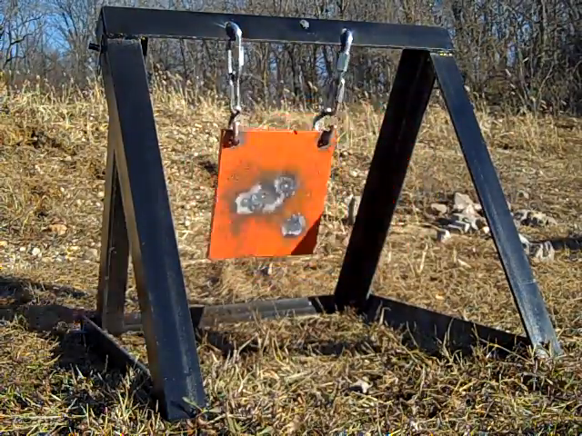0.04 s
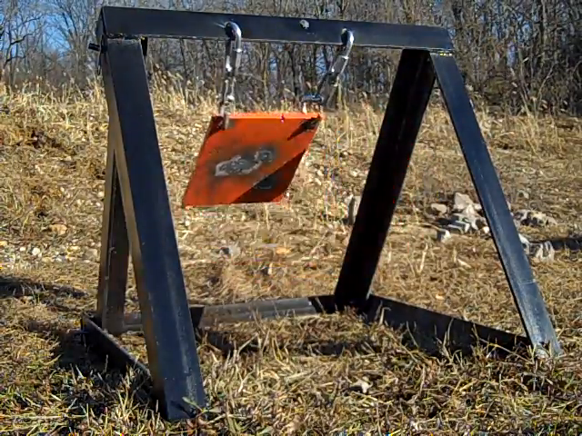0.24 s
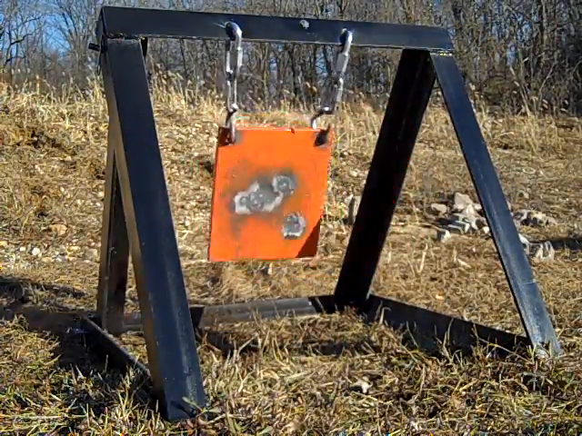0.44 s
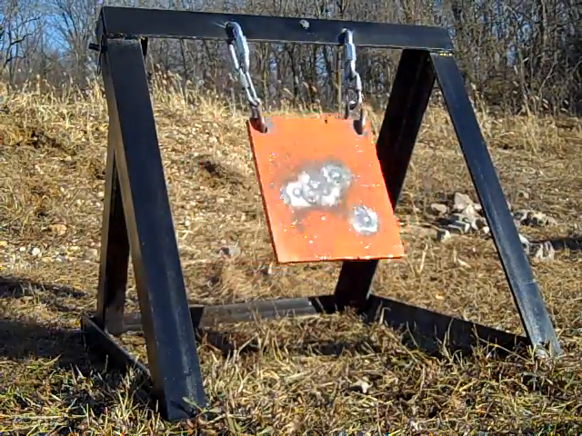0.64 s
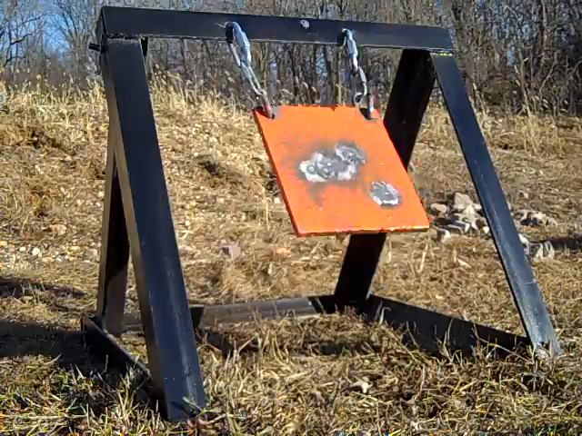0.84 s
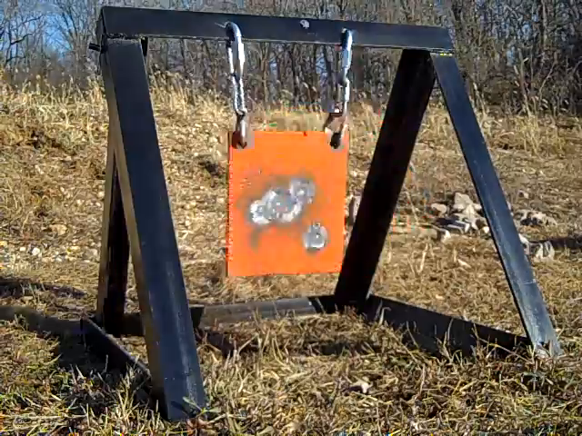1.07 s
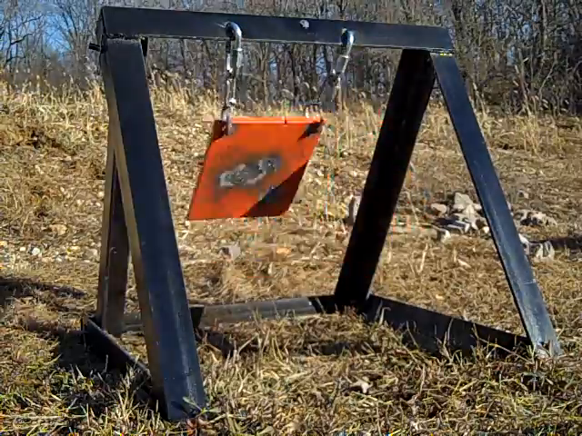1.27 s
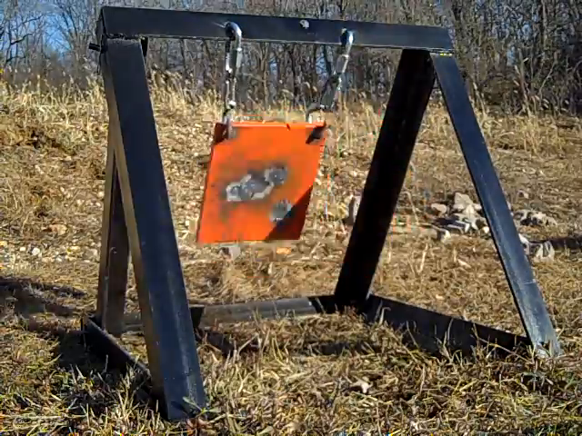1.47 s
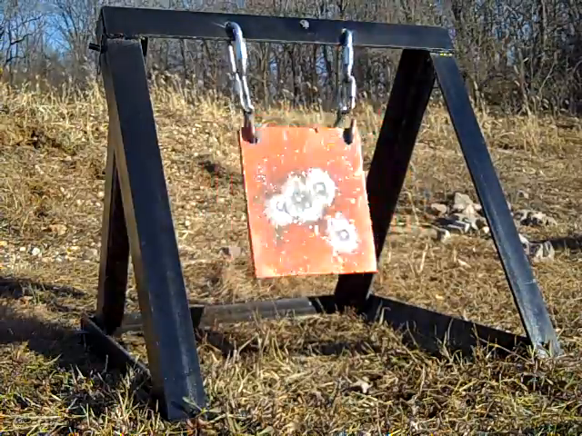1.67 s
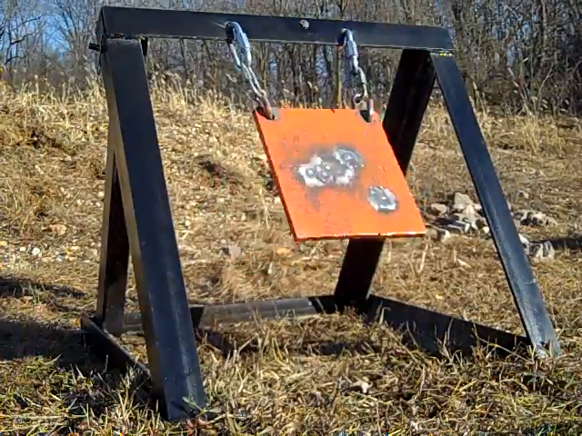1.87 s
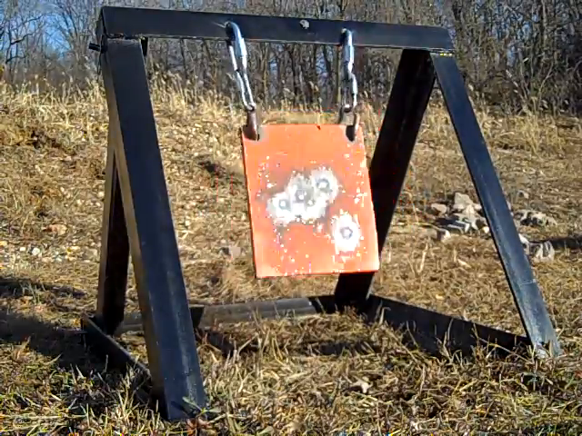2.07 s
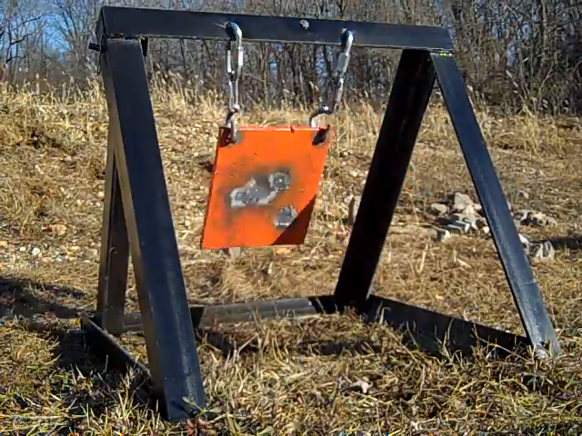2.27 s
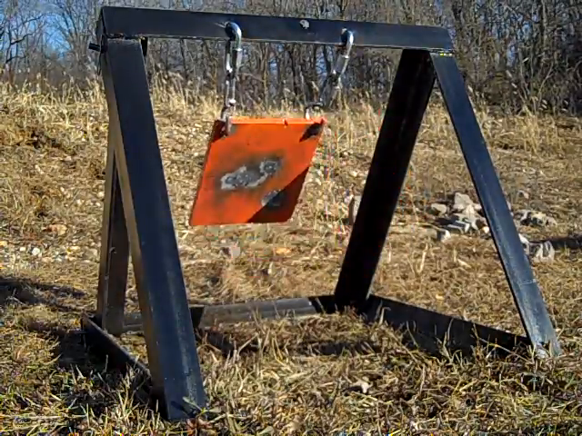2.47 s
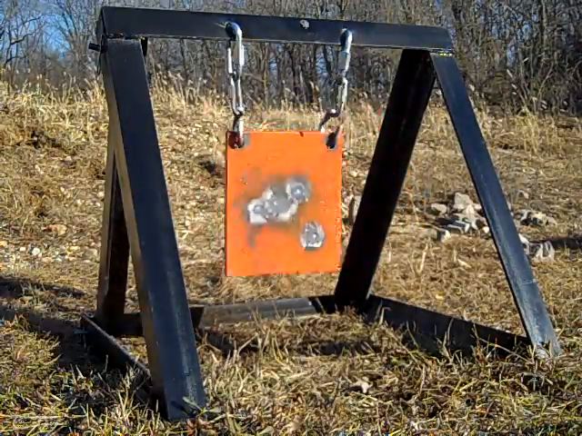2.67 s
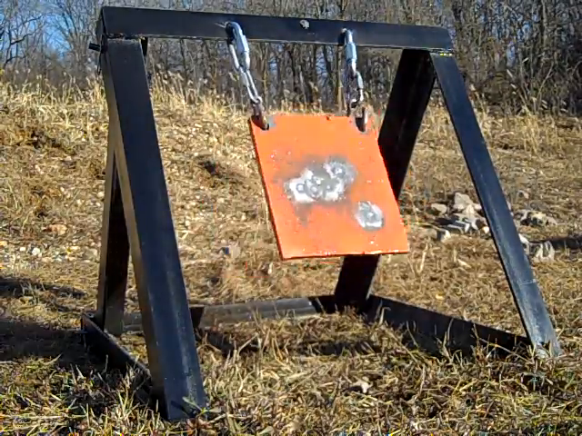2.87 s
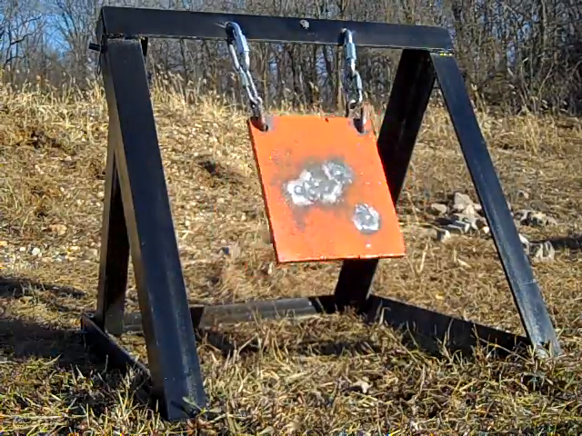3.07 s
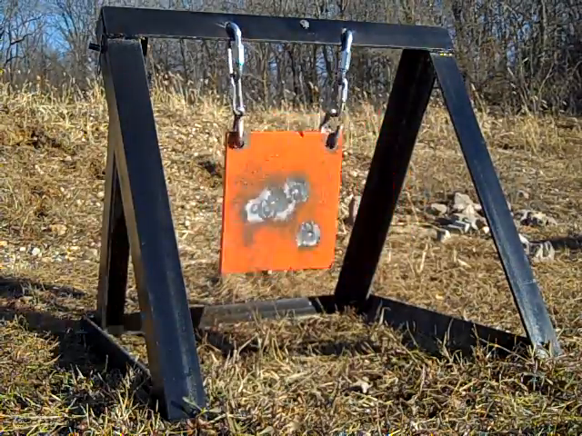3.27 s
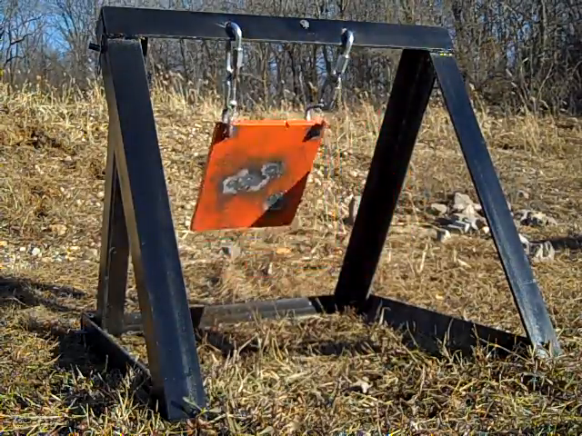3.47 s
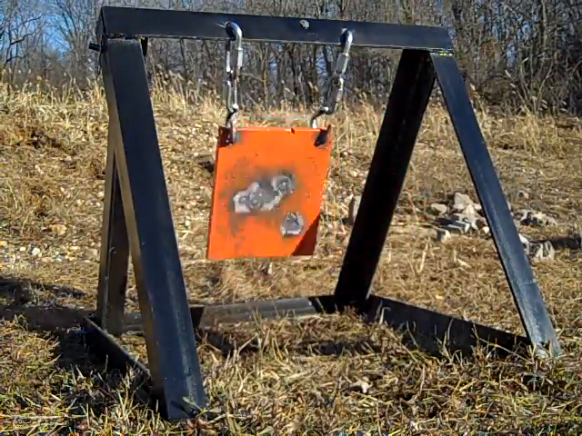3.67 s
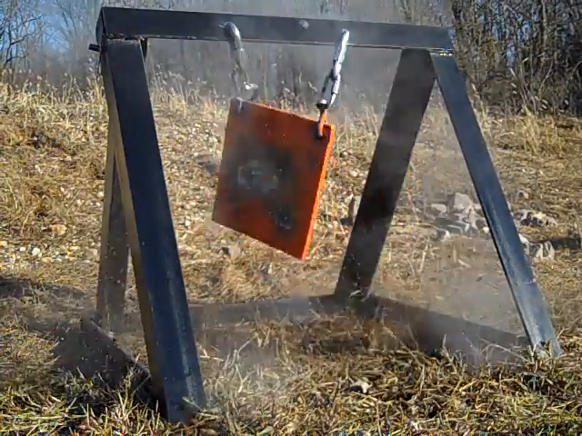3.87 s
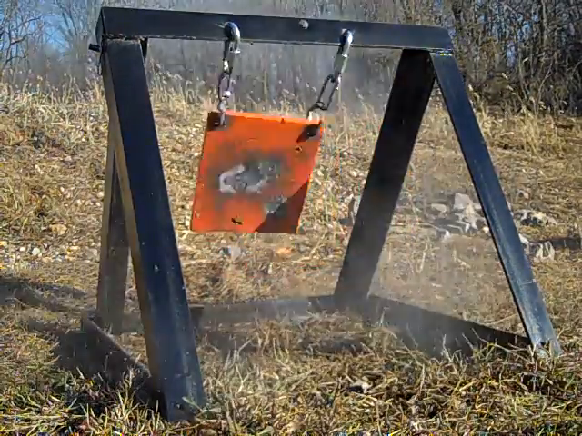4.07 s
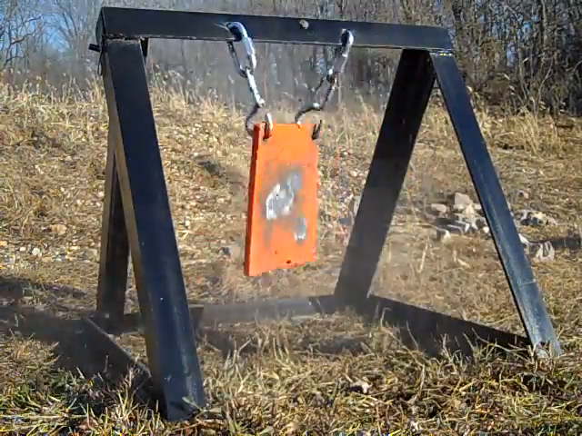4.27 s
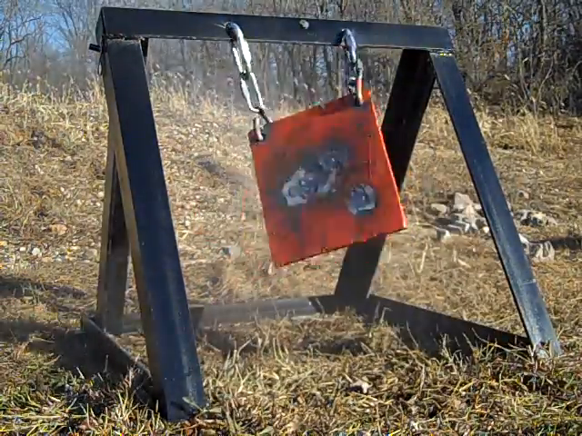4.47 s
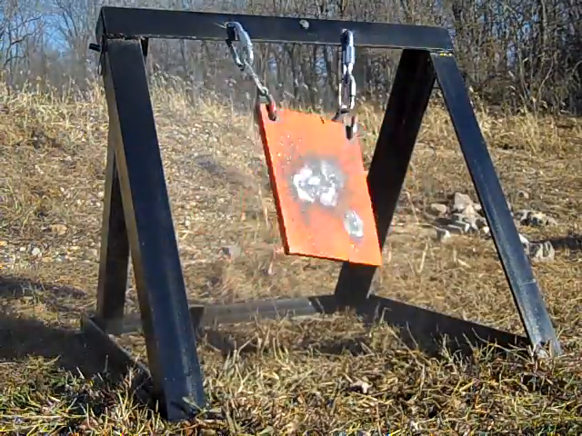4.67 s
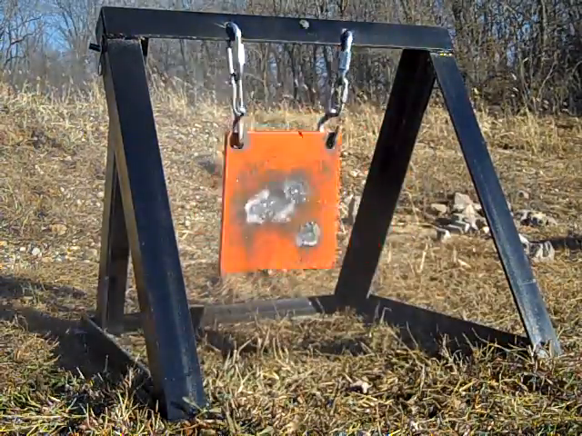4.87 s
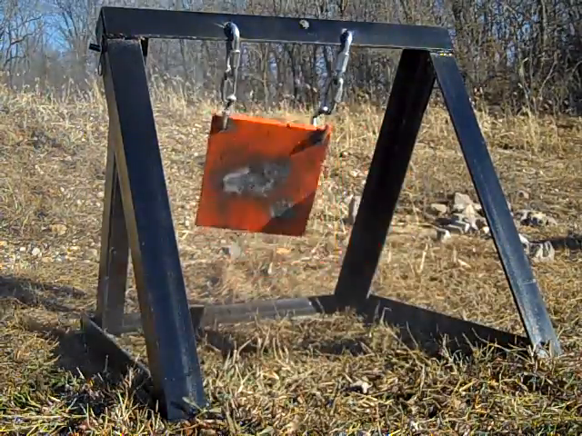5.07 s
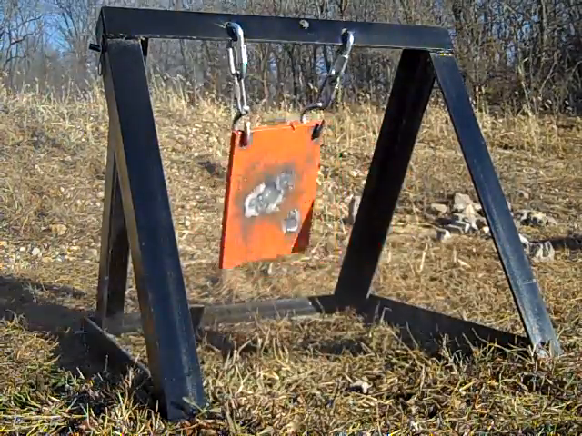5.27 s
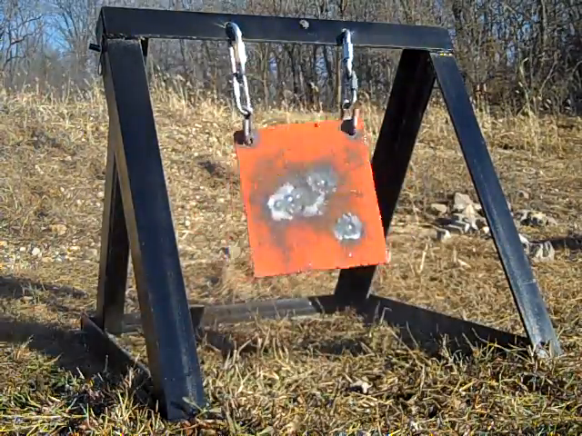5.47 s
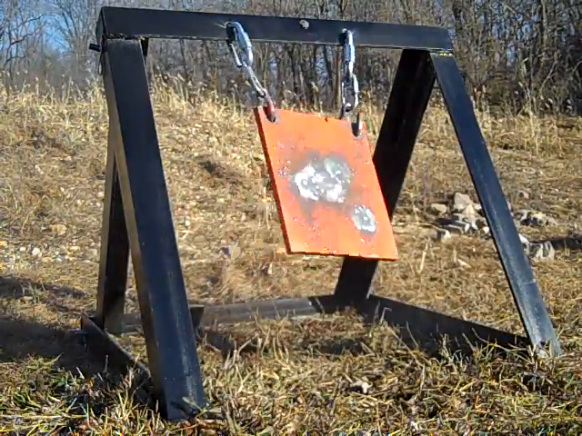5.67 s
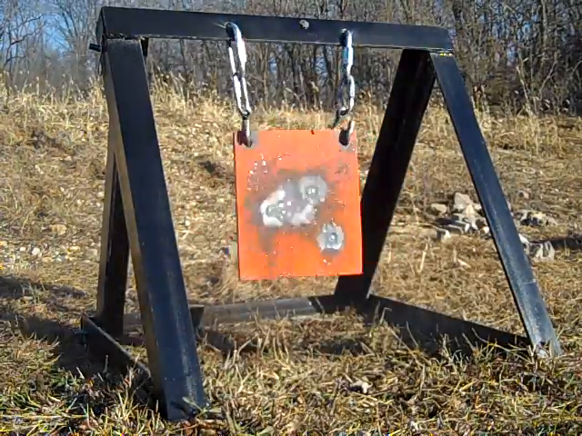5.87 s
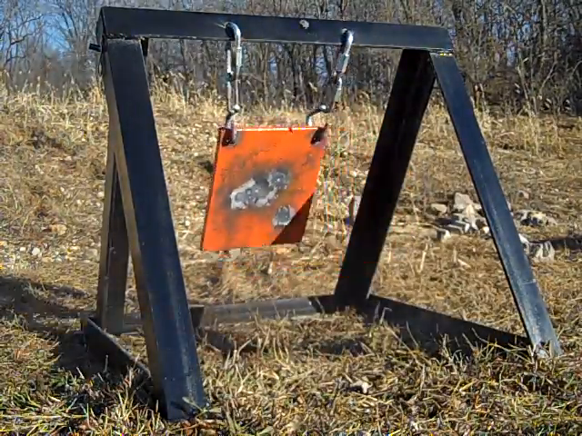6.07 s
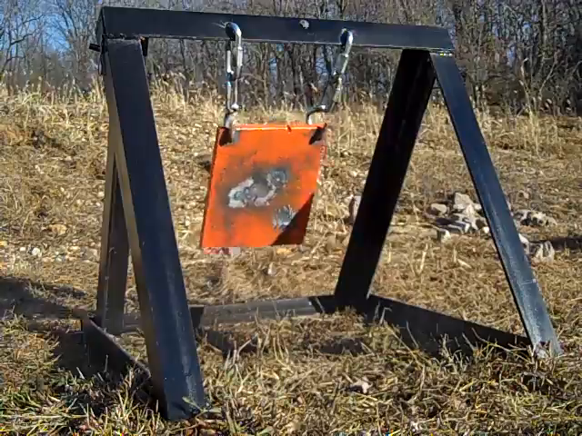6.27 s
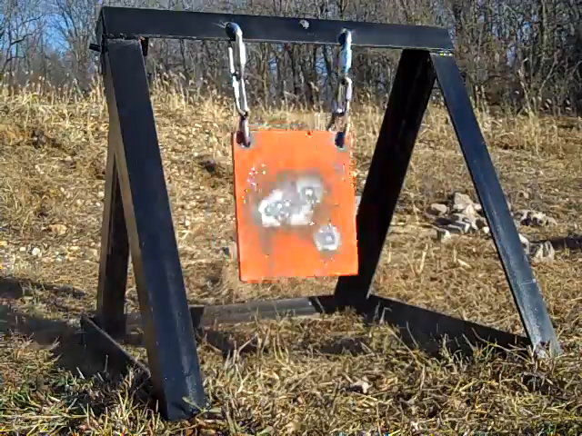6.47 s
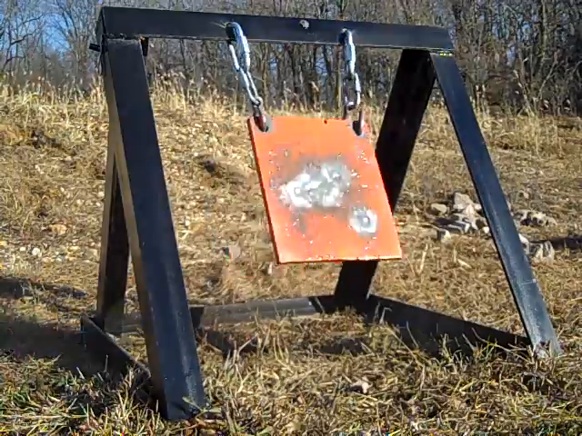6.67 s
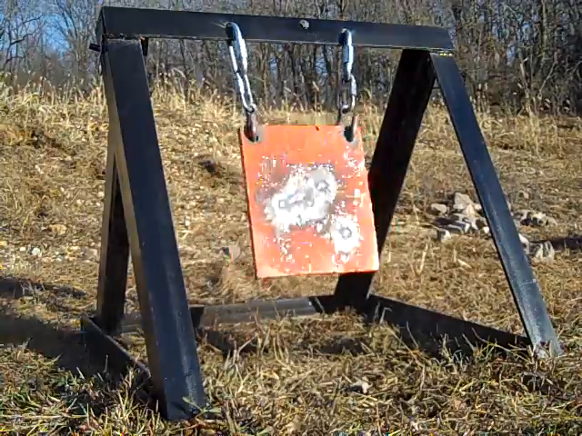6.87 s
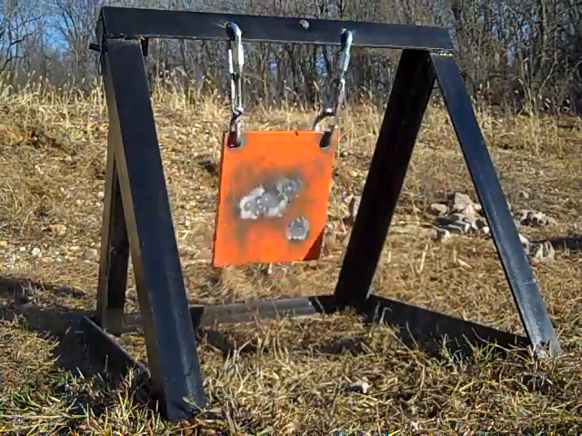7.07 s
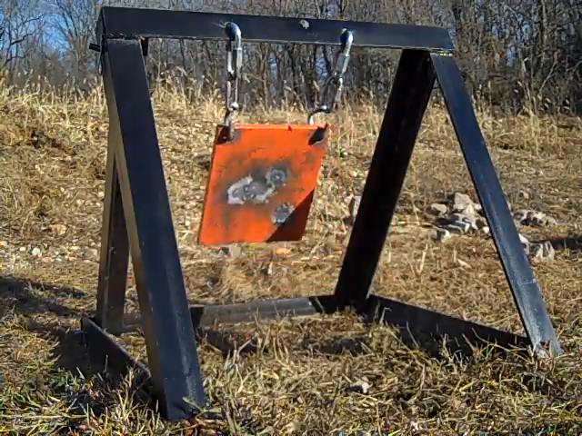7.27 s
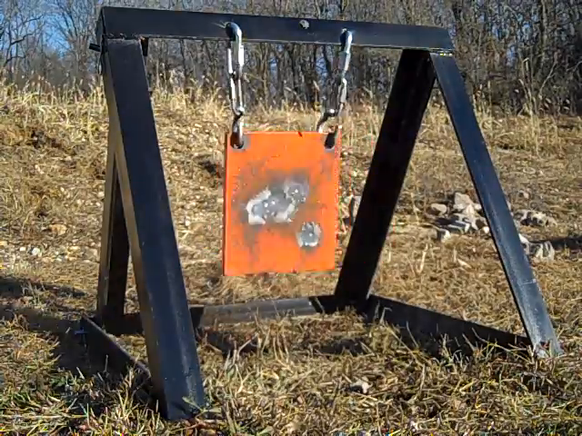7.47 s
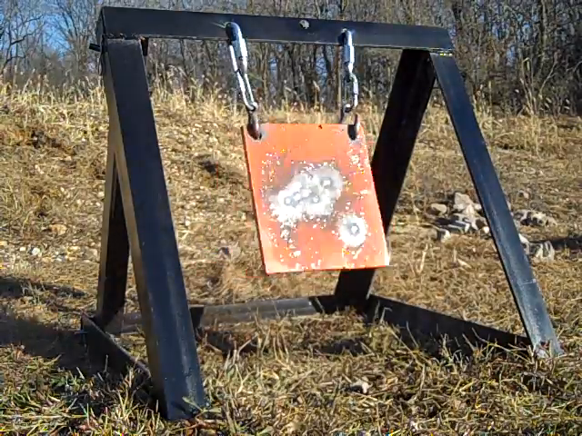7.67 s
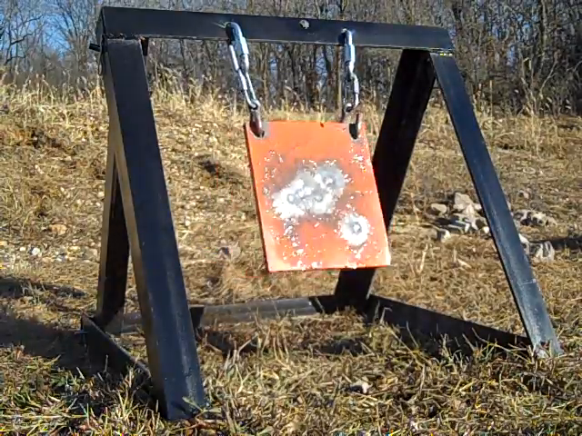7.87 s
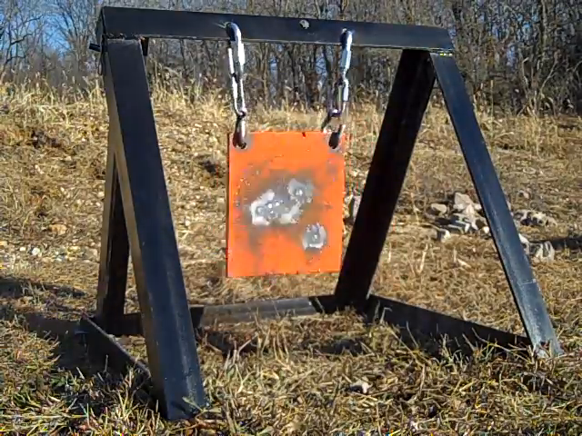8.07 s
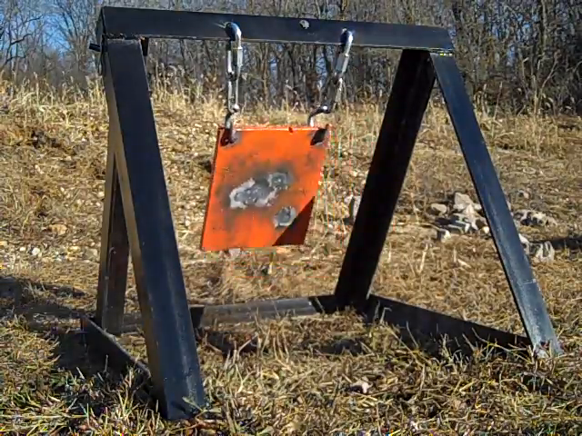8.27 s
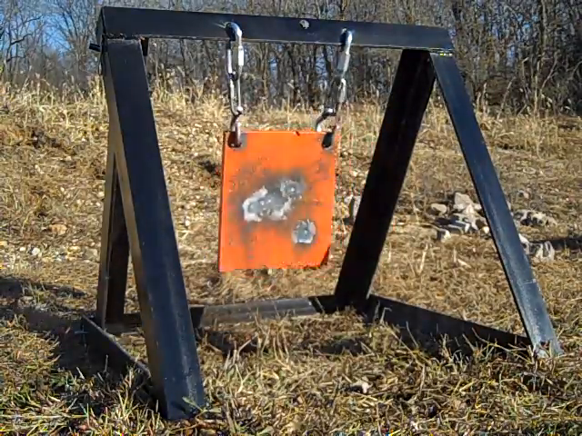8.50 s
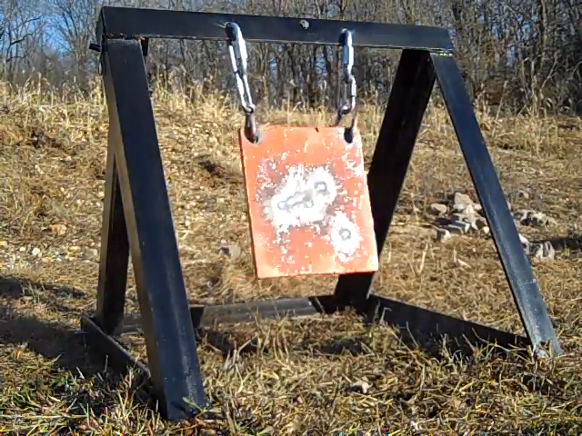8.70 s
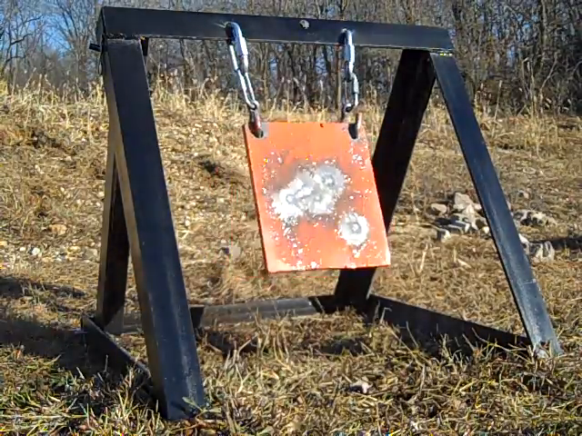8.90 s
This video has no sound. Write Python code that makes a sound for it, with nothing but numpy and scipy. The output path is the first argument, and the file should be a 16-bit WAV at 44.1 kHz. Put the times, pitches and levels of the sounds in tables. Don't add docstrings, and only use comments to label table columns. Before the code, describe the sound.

A steel plate swings on two chains in a dry field, heard very close in stereo. Sharp double clinks sound at about 0, 1.1, 2.2 and 3.3 seconds, with small loose ticks between, over faint low hum and grass hiss. From about 2.9 wind puffs flutter low against the microphone, strongest near 3.6. At 3.85 a bullet hits: a violent, clipped crack with hissing spatter and a high metallic ring that wavers between the sides and is quickly damped. At 4.02 the distant gunshot arrives as a dull thump, its low echo swelling from the woods around 4.7 and fading. Chains jangle from 4.4, with a hard bouncing snap at 4.9 and another strong clack at 5.4, then scattered rattles. Calmer double clinks return near 5.9, 7.05 and 8.1, with light ticks between, until the end near 8.9.

```python
import sys
import numpy as np
from scipy import signal
from scipy.fft import rfft, irfft, next_fast_len
from scipy.io import wavfile
from scipy.ndimage import uniform_filter1d, map_coordinates

SR = 44100
rng = np.random.default_rng(int(sys.argv[2]) if len(sys.argv) > 2 else 0)


def dump(signal):
    limited = np.clip(np.atleast_2d(signal).T, -1, 1)
    pcm = np.round(limited * 32767).astype(np.int16)
    wavfile.write(sys.argv[1], SR, pcm)


def to_linear_factor(level_db):
    exponent = np.asarray(level_db, float) / 20
    return 10 ** exponent


N = 394254
T = np.arange(N) / SR
STRIKE_S, BLAST_S = 3.8506, 4.0169

# t/s, peak level/dB, top level/dB, own ring f/Hz
FIRST_SNAPS = [
    (0.0276, -10.5, -12.5, 6370),
    (1.1228, -7.5, -14.5, 6490),
    (2.2079, -13.5, -10.5, 5410),
    (3.2902, -16, -13, 5530),
    (4.9069, -20.5, -1, 6030),
    (5.906, -26.5, -18, 2220),
    (7.0388, -22.5, -17, 2832),
    (8.105, -12.5, -23.5, 5600),
]
# t/s, peak level/dB, top level/dB, own ring f/Hz
SECOND_SNAPS = [
    (0.0611, -6, -15.5, 2212),
    (1.16, -8.5, -14.5, 2200),
    (2.2523, -8.5, -12, 3710),
    (3.3375, -10.5, -17, 5350),
    (4.9299, -4.5, -6.5, 7620),
    (5.9436, -10, -17, 5600),
    (7.0849, -12.5, -15, 3600),
    (8.1585, -16.5, -20, 5400),
]


def unit(x):
    return x / np.sqrt(np.mean(x ** 2) + 1e-20)


def along(points, hz):
    f, v = np.transpose(points)
    return np.interp(np.log(hz + 1), np.log(f + 1), v)


def curves(rows):
    s, *cols = np.transpose(rows)
    return [np.interp(T, s, c) for c in cols]


def during(rows):
    return (T >= rows[0][0]) & (T < rows[-1][0])


def wobble(rate_hz, size=N):
    knots = rng.standard_normal(int(size * rate_hz / SR) + 4)
    return map_coordinates(knots, [T[:size] * rate_hz])


def rush(spectrum, alike):
    m = next_fast_len(N)
    hz = np.fft.rfftfreq(m, 1 / SR)
    turn = np.arccos(np.clip(along(alike, hz), -1, 1)) / 2
    shape = to_linear_factor(along(spectrum, hz)) * [np.cos(turn), np.sin(turn)]
    mid, side = irfft(rfft(rng.standard_normal((2, m))) * shape, m)[:, :N]
    return unit(np.array([mid + side, mid - side]))


def patchy(x, depth_db):
    z = signal.stft(x, nperseg=512)[2]
    patches = uniform_filter1d(rng.standard_normal(z.shape[1:]), size=2, axis=0)
    patches = uniform_filter1d(patches, size=4, axis=1)
    return unit(signal.istft(z * to_linear_factor(depth_db * unit(patches)), nperseg=512)[1][:, :N])


def cut_short(since, hold_s, level_db, fade_db_s, drop_db_s, remnant_db, remnant_fade_db_s):
    after = np.clip(since - hold_s, 0, None)
    return to_linear_factor(level_db - fade_db_s * since - drop_db_s * after) + to_linear_factor(remnant_db - remnant_fade_db_s * after)


def strike():
    ringing = spatter() + weak_modes()
    return ringing * (T >= STRIKE_S) + strong_modes()


def spatter():
    # f/Hz, width/Hz, level/dB
    spatter_modes = [(1520, 24, -3), (1780, 15, -2.5), (2820, 37, -3.5), (3450, 39, -8), (3720, 20, -8),
                     (5010, 31, 0), (5677, 27, -11.5), (5920, 23, -7), (6070, 37, -8)]
    since = np.clip(T - STRIKE_S, 0, 1)
    apart = [(1000, 0.083)]
    burst = to_linear_factor(-3.5 - 60 * (since / 0.031) ** 4) * rush(
        [(60, 1.5), (300, 3), (700, -3.5), (6500, -2), (13500, -5.5), (14500, -30.5), (21000, -31.5)], apart)
    spray_s = .142
    low_gain = cut_short(since, spray_s, -17, 13.5, 950.5, -40.5, 112)
    high_gain = cut_short(since, spray_s, -21.5, 49.5, 399.5, -49, 199)

    rough = to_linear_factor(1.5 * wobble(300))
    low = rush([(100, 1), (400, 0.5), (2400, -2), (3400, -4.5), (5200, -1.5), (5500, -13.5), (5800, -3.5),
                (9000, -20.5)], apart)
    crowded = to_linear_factor(3.5 * wobble(40, size=N // 2 + 1))
    low = rough * patchy(irfft(rfft(low) * crowded, N), depth_db=4.5)
    hz = np.fft.rfftfreq(N, 1 / SR)
    streaks = sum(to_linear_factor(db) * width / np.hypot(width, hz - f) for f, width, db in spatter_modes)
    low += to_linear_factor(-7) * unit(irfft(rfft(rng.standard_normal((2, N))) * streaks, N))

    high = rush([(5500, -22.0), (7500, 0.0), (10000, -4.0), (12000, -14.0), (14200, -61.5)], apart)
    top = rush([(9000, -20), (11000, -2.0), (13500, 0), (14200, -57.0)], apart)
    high += to_linear_factor(-1.5 - 60 * since / 0.51) * top
    return burst + low_gain * low + to_linear_factor([[2], [-2]]) * high_gain * high


def strong_modes():
    # t/s, level/dB
    low_rows = [(3.851, -36), (3.893, -38.5), (3.903, -20), (3.922, -24), (3.95, -12), (3.98, -11.5),
                (4.08, -28.5), (4.115, -56), (4.45, -60)]
    mid_rows = [(3.851, -15), (3.866, -14), (3.877, -2.5), (3.895, -13.5), (3.915, -18), (3.95, -40),
                (4.0, -58)]
    high_rows = [(3.88, -36), (3.935, -10), (3.962, -33), (3.995, -19.5), (4.045, -32.5), (4.082, -25),
                 (4.12, -50.5), (4.22, -53), (4.3, -65)]
    out = beamed(low_rows, rest_hz=4371, sag_hz=22, settle_s=.11, lean_db=30, drift_db_s=-16, half_db=-13.5)
    out += beamed(mid_rows, rest_hz=6466, sag_hz=90, settle_s=.015, lean_db=-18, drift_db_s=2)
    return out + beamed(high_rows, rest_hz=6568, sag_hz=25, settle_s=.05, lean_db=3, drift_db_s=-21.5)


def beamed(rows, rest_hz, sag_hz, settle_s, lean_db, drift_db_s, half_db=-200):
    db, = curves(rows)
    since = np.clip(T - STRIKE_S, 0, 1)
    pan_db = lean_db * np.exp(-since / 0.019) + drift_db_s * since
    hz = rest_hz - sag_hz * np.exp(-since / settle_s)
    phase = 2 * np.pi * np.cumsum(hz) / SR + np.array([[.3], [-.3]])
    buzz = to_linear_factor(half_db + 0.37 * (db + 11.0) + 3 * wobble(79)) * np.sin(.496 * phase + 1.1 * wobble(60))
    tone = np.sin(phase) + buzz * (T < BLAST_S)
    level_db = db + np.array([pan_db, -pan_db]) / 2 + 1.1 * wobble(60)
    return np.sqrt(2) * to_linear_factor(level_db) * tone * during(rows)


def weak_modes():
    mode_hz = [1518, 2500, 5017, 7160, 7192, 8129, 8759, 9145, 9170, 10340, 10830, 11850, 12900, 13400]
    # level/dB, t60/s
    mode_decays = [(-18, 0.38), (-15.5, .3), (-6.5, 0.24), (-4.5, 0.14), (2, 0.27), (-13, .3), (-14.5, .3),
                   (-8.5, 0.58), (-12, 1.0), (-19.5, 0.74), (-14.5, .3), (-17, .2), (-5.5, .15),
                   (-23.5, .6)]
    out, n = np.zeros((2, N)), SR // 2
    t = T[:n]
    weak = np.zeros((2, n))
    for hz, (db, t60_s) in zip(mode_hz, mode_decays):
        flicker_db = 3.5 * np.array([wobble(16, size=n), wobble(13, size=n)])
        weak += to_linear_factor(db - 60 * t / t60_s + flicker_db) * np.sin(2 * np.pi * hz * t)
    caught = cut_short(t, 0.267, -18.5, -1, 600, -40, 153)
    out[:, round(STRIKE_S * SR):][:, :n] = to_linear_factor(4.0 + np.array([[3], [-3]])) * caught * weak
    return out


def glance():
    # t/s, level/dB
    swell = [
        (4.975, -56),
        (5.003, -34),
        (5.03, -45),
        (5.075, -60),
    ]
    return np.sqrt(2) * to_linear_factor(curves(swell)[0]) * during(swell) * np.sin(2 * np.pi * 6600 * T)


def chains():
    # f/Hz, density/dB per Hz
    clack = [(240, -58.5), (400, -26.5), (628, -33.5), (727, -23.5), (1130, -20), (1530, -21), (2140, -3.5),
             (2580, -19.5), (2940, -13), (4110, -13), (4900, -11.5), (7580, -9.5), (13000, -53)]
    # f/Hz, level/dB, t60/s
    chain_modes = [(518, -20.5, .08), (766, -23.5, 0.13), (948, -19, 0.11), (1130, -14.5, 0.095),
                   (1377, -13, 0.071), (1817, -10.5, 0.084), (2116, -3.5, 0.067), (2190, -8, 0.11),
                   (2520, -12, 0.13), (2650, -8, 0.1), (2833, -9, 0.2), (3020, -12.5, 0.2),
                   (3440, -18.5, 0.12), (3570, -17.5, 0.1),
                   (3668, -15, 0.15), (4200, -6.5, 0.056), (4740, 1.5, 0.049), (4990, -8.5, 0.11),
                  (5520, -10, 0.064), (5420, -8, .1), (5530, -9.5, 0.18), (5750, -6.5, 0.066),
                  (6370, -5.5, 0.073), (6713, -13, .08), (6800, -15.5, .12), (7470, -5, .15),
                  (7170, -5, 0.071), (8290, -7, 0.13)]
    # f/Hz, level/dB, t60/s
    plate_modes = [(4357, -2, 0.11), (4940, -14, .2), (5346, -13.5, .2), (5600, -8.5, 0.28),
                   (6050, -13.5, 0.19), (6300, -6, 0.08), (6300, -9, 0.23), (6560, -9.5, .3),
                   (7176, -8.5, 0.091), (8150, -4.5, 0.15), (8650, -13, 0.12), (9160, -16.5, 0.09),
                   (10800, -29.5, 0.45)]
    out, t = np.zeros((2, N + SR)), np.arange(SR // 5) / SR
    n = len(t)
    hz = np.fft.rfftfreq(n, 1 / SR)
    rows = contacts()
    chance = rng.standard_normal((len(rows), 2, 4, 30))
    tap_chance = rng.uniform(size=(len(rows), 2, 5, 1))
    combs_db = 6 * rng.standard_normal((len(rows), 200))

    rattle = rush(clack + [(14000, -87)], [(1000, 1.0), (3000, 0.73), (6500, 0.36), (12000, .1)])
    rattle = np.pad(rattle * to_linear_factor(4.2 * wobble(250)), ((0, 0), (0, SR)), "wrap")
    shake = np.pad(to_linear_factor(2.5 * wobble(180)), (0, SR), "wrap")
    edge = np.diff(rng.standard_normal((2, 2 * SR)), n=4) / 8
    turn = np.exp(-(t / .07) ** 4) + to_linear_factor(-20)
    rise = np.clip((t - .0009) / .0005, to_linear_factor(-20), 1) * (1 - np.exp(-t / .0003))

    for k, (s, db, top_db, own_hz) in enumerate(rows):
        link_chance, plate_chance = chance[k]
        late, size = tap_chance[k]
        seated = seating(k, s)
        taut = bool(seated)
        i = round(s * SR)
        rough = shake[i:i + n]

        after = t - .06 * late
        taps = np.clip(after / .0015, 0, 1) * to_linear_factor(-15 - 12 * size - 16 * late - 60 * np.abs(after) / .03)
        fade = to_linear_factor(-60 * t / .025) + to_linear_factor(-11 - 60 * t / .12) + taps.sum(axis=0)

        low_db = -14 - .3 * db
        tilt = [(1000, low_db + 11.5), (2200, low_db + 8), (4500, 0.004), (8000, top_db + 11.5)]
        comb_db = np.interp(hz, np.linspace(0, SR / 2, combs_db.shape[1]), combs_db[k] * (1 - 0.34 * taut))
        grit = irfft(rfft(rattle[:, i:i + n]) * to_linear_factor(along(tilt, hz) + comb_db - 2.5), n)
        knock = to_linear_factor(-7.0 - .5 * taut) * grit * fade

        loose = ring(chain_modes, tilt, 0.85 + 0.5 * size[0], t, link_chance)
        knock += to_linear_factor(-16.0 - 4.5 * taut) * rough * loose
        knock += to_linear_factor(top_db - 15.5 - 60 * t / 0.012) * edge[:, i % SR:][:, :n]

        twist = np.exp(-abs(s - STRIKE_S) / 1.67) * (s > STRIKE_S)
        share_db = -22.5 + (21 + 0.46 * db) * twist
        knock += to_linear_factor(share_db) * turn * ring(plate_modes, [(4000, 0.00036)], 0.7, t, plate_chance)
        knock += to_linear_factor(-11.5 - 60 * t / 0.07) * np.sin(2 * np.pi * own_hz * t)
        if seated:
            modes, seated_db = seated
            taut_ring = ring(modes, [(1000, -4), (2000, 0)], .9, t, plate_chance[:, ::-1],
                             spread=.001, scatter_db=3)
            knock += to_linear_factor(seated_db) * np.sqrt(rough) * taut_ring
        soft_rise = 1 - np.exp(t / (.00006 * db))
        out[:, i:i + n] += to_linear_factor(db) * knock * rise * soft_rise
    ground = np.pad(out, ((0, 0), (round(.0047 * SR), 0)))[::-1, :N]
    return out[:, :N] + to_linear_factor(-13) * ground


def contacts():
    # t/s, peak level/dB, top level/dB, own ring f/Hz
    jolts = [(0.5011, -25.5, -24, 2390), (0.6434, -29, -9, 2104), (1.5955, -27, -19, 2260),
             (1.734, -28.5, -14.5, 2200), (2.6715, -28, -25, 2210), (2.7503, -42.5, -9, 4660),
             (2.827, -29, -19, 2210), (3.777, -29.5, -23, 2230), (4.411, -18.5, -11.5, 5500),
             (4.4642, -29.5, -1.5, 5540), (4.54, -13.5, -33, 1994), (4.7004, -20, -5, 5600),
             (4.745, -15.5, -13.5, 2130), (5.171, -36.5, -9, 4730), (5.205, -22.5, -24, 1970),
             (5.2714, -23, -19, 2070), (5.402, -9, -12, 6740), (5.447, -29.5, -15, 2950),
             (5.6974, -17, -19, 2040), (6.042, -24.5, -29, 2890), (6.093, -30, -7.5, 6150),
             (6.4927, -17, -21, 2190), (6.549, -33.5, -15, 5530), (7.019, -51, 5, 7750),
             (7.5976, -34.5, -9, 6320), (7.662, -39, -12, 5760), (8.652, -33, -19.5, 8100)]
    # t/s, peak level/dB
    bounces = [
        (4.9363, -8.5),
        (4.9445, -7),
        (4.954, -11),
        (4.972, -17.5),
        (4.99, -23),
        (5.006, -31),
    ]
    # t/s, peak level/dB, top level/dB
    ticks = [(0.5396, -34, -12), (0.586, -37, -5), (0.6594, -40, -20), (0.6987, -39, -6),
             (1.6294, -37.5, -18), (2.7046, -34, -10), (4.6644, -26, -7), (4.8354, -28, -21),
             (4.8974, -33, -12), (5.2254, -22.5, -39), (5.2444, -29, -25), (5.3194, -34, -25),
             (5.3687, -26.5, -22), (5.4849, -32.5, -29), (5.5821, -32, -26.5), (5.614, -38, -25),
             (5.6435, -37, -29), (6.1638, -38.5, -26), (6.2945, -43.5, -9), (6.3554, -33.5, -18),
             (6.3875, -37.5, -20), (6.587, -39.5, -20), (1.052, -53, -6), (7.4573, -37.5, -27),
             (7.5117, -41.5, -15), (8.5852, -39, -19.5), (8.7145, -35.5, -19), (5.2646, -36, -25),
             (5.296, -30, -28), (5.6806, -40, -24), (5.4605, -30.5, -22)]
    tick_top_db = -7.5
    lead = [(s - .101, db - 30, tick_top_db) for s, db, *_ in FIRST_SNAPS[1:4]]
    settle = [(s + .072, db - 32.5, tick_top_db) for s, db, *_ in SECOND_SNAPS]
    rebounds = [(s, db, -12, 6560) for s, db in bounces]
    soft = [(*row, 2200) for row in ticks + lead + settle]
    return FIRST_SNAPS + SECOND_SNAPS + jolts + rebounds + soft


def seating(k, s):
    # f/Hz, level/dB, t60/s
    first_calm = [(950, -14, .1), (1211, -14, .1), (1625, -15, .12), (2160, 2, .05), (2234, -8, .12),
                  (3720, -10, .12), (4750, -4, .08), (5350, -5, .08), (5580, -8, .15), (6024, -5, .1),
                  (6360, 1, .07), (7154, -9, .07), (7620, -4, .06), (8183, -6, .08)]
    second_calm = [(950, -12, .12), (1930, -16, .24), (2140, 4, .055), (2616, -5, .14), (3040, -9, .16),
                   (3534, -9, .18), (3640, -5, .22), (4780, 1, .06), (5351, 0, .11), (5577, -3, .14),
                   (5696, -5, .13), (7004, -6, .15), (7332, -4, .16), (8325, -3, .1)]
    first_reseated = [(950, -12, .1), (1200, -10, .07), (2130, -5, .07), (2860, -1, .12), (3050, -9, .14),
                      (3499, -9, .12), (4250, -1, .07), (4990, -8, .12), (5588, -7, .086), (6336, -7, .09),
                      (7160, -14, .15), (7639, -10, .095), (8300, -10, .08)]
    second_reseated = [(950, -14, .12), (1927, -13, .22), (2150, 3, .05), (2552, -7, .13), (2880, -2, .13),
                       (3639, -4, .26), (3903, -9, .15), (4138, -14, .17), (4872, 0, .11), (5100, 1, .05),
                       (5378, 0, .14), (6400, -5, .1), (7600, -1, .08), (8270, -6, .1)]
    second_twisted = [(1250, -14, .07), (2180, -7, .08), (2859, -11, .13), (3440, -6, .09), (3644, -18, .3),
                      (4285, -10, .08), (5373, -10, .12), (5577, 0, .08), (6347, -13, .1), (7004, -16, .13),
                      (7160, -15, .13), (7634, -8, .08), (8247, -14, .13)]
    seated_db = [-15.5, -18, -18, -17, -12.5]
    if k >= len(FIRST_SNAPS + SECOND_SNAPS) or STRIKE_S < s < 5.92:
        return None
    sets = first_calm, second_calm, first_reseated, second_reseated, second_twisted
    which = 4 if STRIKE_S < s < 6 else (k >= len(FIRST_SNAPS)) + 2 * (s > STRIKE_S)
    return sets[which], seated_db[which]


def ring(modes, tilt, stretch, t, chance, spread=.012, scatter_db=3.5):
    hz, db, t60_s = np.transpose(modes)[:, :, None]
    strength, skew, detune, start = chance[:, :len(modes), None]
    decay_db = 60 * t / (np.clip(t60_s, .03, .4) * stretch)
    fade = to_linear_factor(db + along(tilt, hz) + scatter_db * strength - decay_db)
    phase = 2 * np.pi * (hz * (1 + spread * detune) * t + start)
    lag = skew * (hz / 9000) ** 2
    return np.array([(fade * np.sin(phase + side * lag)).sum(axis=0) for side in (1, -1)])


def blast():
    t = np.clip(T - BLAST_S, 0, .05)
    swing = np.sin(2 * np.pi * 1.6 * (1 - np.exp(-t / .0043)))
    wave = swing * np.exp(-np.abs((t - .0028) / .0039) ** 1.5)
    crack = rush([(400, -7.0), (1000, 0.5), (5000, -2.5), (8000, -13), (10000, -50.5)], [(1000, .8)])
    return to_linear_factor([[-2.5], [-4.5]]) * wave + to_linear_factor(-26 - 60 * t / 0.026) * (t > 0) * crack


def woods():
    # f/Hz, density/dB per Hz
    boom = [(50, -27), (100, -10.5), (160, -4.5), (230, -1), (330, -5.5), (600, -26.5), (900, -57)]
    body = [(250, -45), (450, 5), (900, -1), (2400, -11), (3300, -31)]
    hiss = [(1800, 3), (3000, 0.5), (7000, -6), (9000, -12), (10500, -36.5)]
    # f/Hz, left-right likeness
    echo_alike = [(60, 0.98), (180, 1), (520, 0.93), (1550, 0.49), (4580, 0.12), (13500, 0.39)]
    treeline_s = 4.666
    before, after = np.clip(treeline_s - T, 0, None), np.clip(T - treeline_s, 0, None)

    def gain(peak_db, swell_db_s, fall_db_s, hills_db, hills_fall_db_s):
        fall = to_linear_factor(peak_db - fall_db_s * after) + to_linear_factor(hills_db - hills_fall_db_s * after)
        return to_linear_factor(-swell_db_s * before) * fall

    lumps_db = 1.1 * wobble(25)
    roll = gain(-20, 51, 70, -32.5, 14.5) * to_linear_factor(lumps_db) * rush(boom, echo_alike)
    body_noise = rush(body + [(9000, -70.5)], echo_alike)
    roll += gain(-32.5, 40, 47.5, -36.5, 17) * to_linear_factor(2.5 + 1.4 * lumps_db) * body_noise
    roll += gain(-42, 14.5, 55, -71, 13) * to_linear_factor(8.0) * rush(hiss + [(12000, -60.0)], echo_alike)
    return roll * np.clip((T - BLAST_S - .013) / .03, 0, 1)


def wind():
    # t/s, level/dB
    gust = [(2.75, -83), (2.9, -48), (3.1, -50), (3.3, -39.5), (3.55, -33.5), (3.84, -38), (3.95, -70)]
    # t/s, peak level/dB, f/Hz
    left_puffs = [
        (3.391, -27, 60.3),
        (3.458, -21, 82.5),
        (3.627, -11.5, 98),
        (3.621, -31, 453),
        (3.64, -22, 287),
        (3.757, -28, 70),
        (5.891, -19, 42.9),
        (6.643, -29, 34.6),
    ]
    right_puffs = [
        (2.862, -25, 71.4),
        (2.965, -26, 54.7),
        (3.146, -26.5, 80),
        (3.438, -24, 50.5),
        (3.5, -20.5, 130),
        (3.609, -19.5, 188),
    ]
    # f/Hz, cycles an eddy lasts
    puff_cycles = [(40, 0.51), (65, 0.25), (110, 0.68)]
    lumps = to_linear_factor(8.3 * np.array([wobble(13), wobble(5.2)]))
    buffet = rush([(15, -6.5), (50, 3), (120, -5.5), (300, -35), (600, -56.5)], [(50, 0.00081)])
    out = to_linear_factor(curves(gust)[0]) * during(gust) * unit(lumps * buffet)
    half = SR // 10
    t = np.arange(-half, half) / SR
    for port, puffs in enumerate((left_puffs, right_puffs)):
        for s, db, hz in puffs:
            swell = np.exp(-(hz * t / along(puff_cycles, hz)) ** 2)
            puff = np.cos(2 * np.pi * hz * t + 0.93) * swell
            out[port, round(s * SR) - half:][:len(t)] += to_linear_factor(db) * puff
    return out


def field():
    # f/Hz, density/dB per Hz
    hum_colour = [(12, -39.5), (20, -16.5), (71, 1), (129, -1), (263, -6.5), (650, -19), (1320, -25),
                  (5220, -27), (7660, -25), (9020, -30.5), (12900, -32.5), (14000, -37.5)]
    # f/Hz, left-right likeness
    hum_alike = [(60, 0.96), (180, 0.79), (520, 0.61), (1550, 0.21), (4580, -0.14), (13500, -0.03)]
    # t/s, grass level/dB
    breeze = [(0, -68), (1.2, -64.5), (2.6, -57.5), (3.7, -57.5), (4.2, -48.5), (5.1, -59.5), (5.7, -58),
              (7, -64), (8.94, -65)]
    grass_db, = curves(breeze)
    hum_db = -39 + .21 * grass_db
    hum = to_linear_factor(hum_db + 2.5 + 1.2 * wobble(5)) * rush(hum_colour + [(14300, -100)], hum_alike)
    grass = rush([(4500, -24.5), (6500, -5), (8000, -4.5), (9500, -14.5), (12000, -38.5)], [(1000, 0.0056)])
    return hum + to_linear_factor(grass_db - 1.0) * grass


def scene():
    return strike() + glance() + chains() + blast() + woods() + wind() + field()


def top_cut(x):
    return signal.sosfilt(signal.butter(12, 14140, fs=SR, output="sos"), x)


def record(dry):
    # t/s, shift/full scale
    sag_rows = [(3.85, 0), (3.854, -0.46), (3.878, -0.095), (3.96, -0.11), (4.0, 0.19), (4.03, 0.072),
                (4.15, 0)]
    sag = curves(sag_rows)[0] * np.array([[1], [-.41]])
    shifted = dry * (1 + 0.22 * np.abs(sag)) + 2.2 * sag * (1 - .55 * (T > 3.88))
    return top_cut(np.clip(shifted, -1, 1))


dry = scene()
out = record(dry)
dump(out)
```